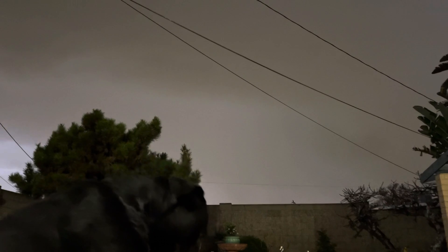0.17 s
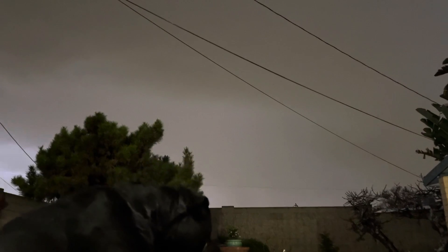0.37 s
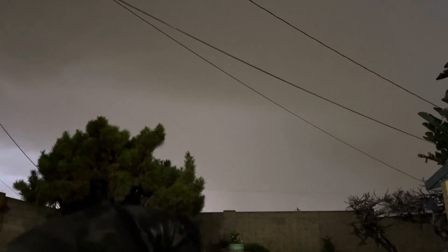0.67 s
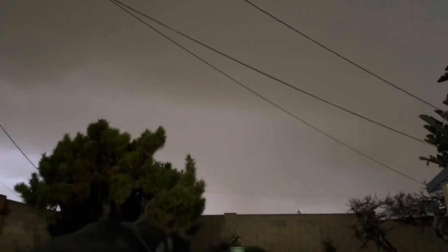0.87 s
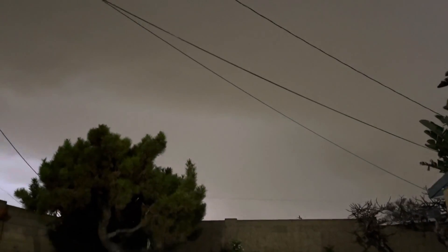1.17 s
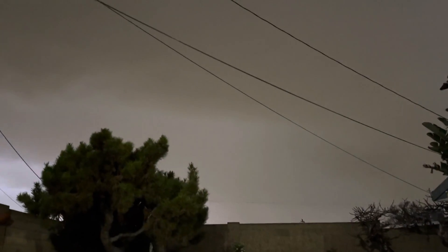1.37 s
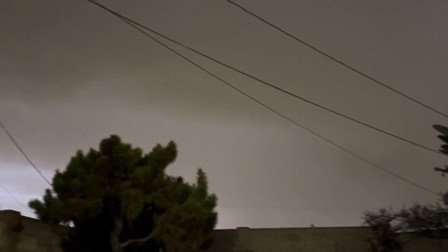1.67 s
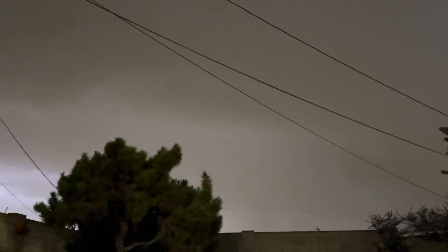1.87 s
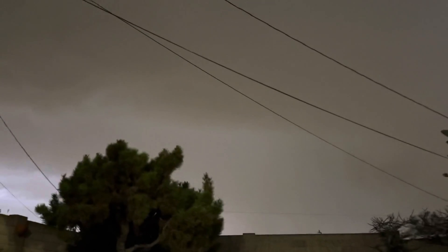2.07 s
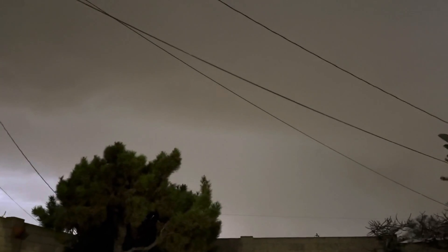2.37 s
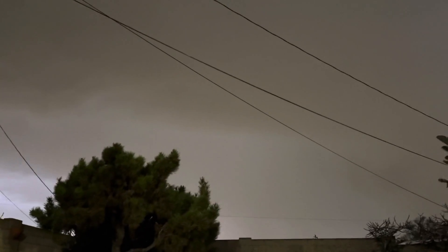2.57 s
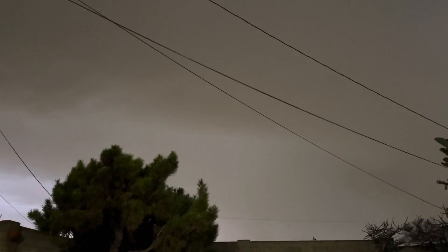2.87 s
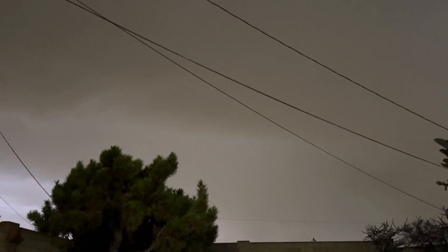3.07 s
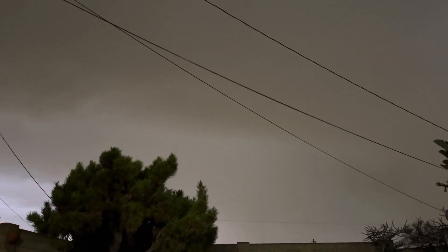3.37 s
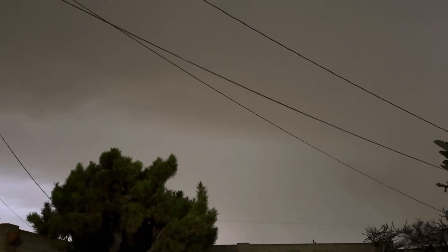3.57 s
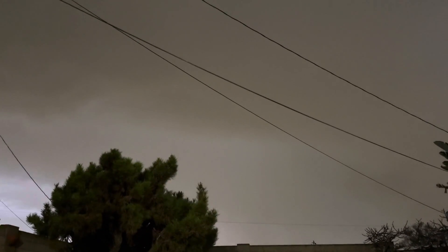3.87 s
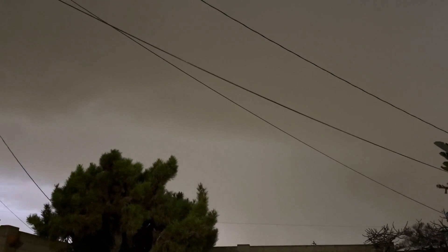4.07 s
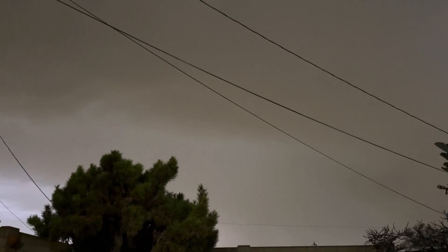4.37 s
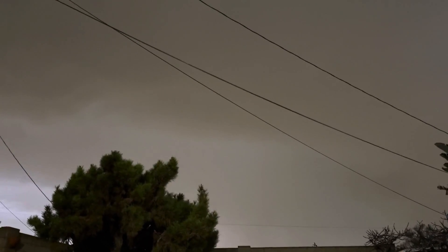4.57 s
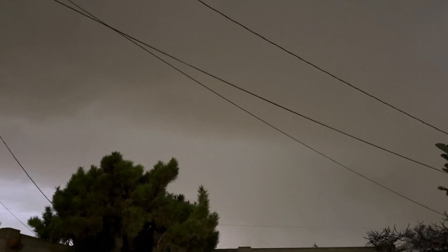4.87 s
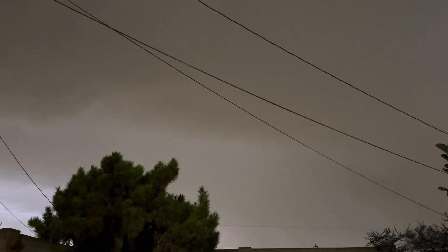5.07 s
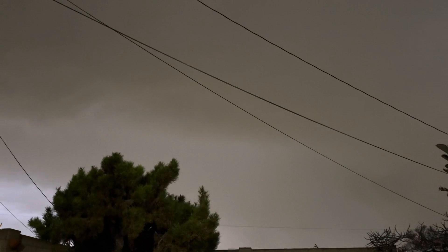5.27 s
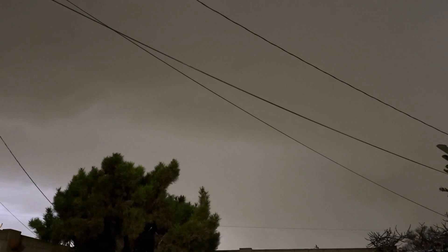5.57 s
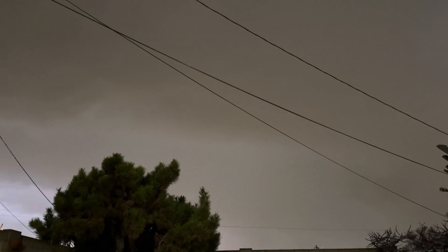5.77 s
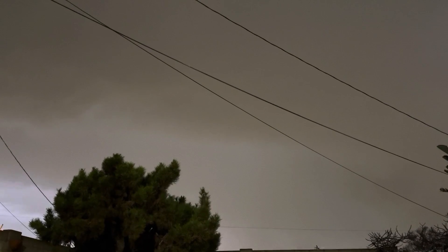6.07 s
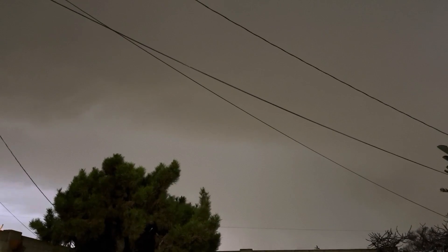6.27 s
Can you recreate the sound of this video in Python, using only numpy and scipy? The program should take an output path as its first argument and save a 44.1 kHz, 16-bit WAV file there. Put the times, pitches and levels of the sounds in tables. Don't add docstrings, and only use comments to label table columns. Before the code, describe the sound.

Long low thunder booms and grumbles over a quiet yard, with close fur rustles, tiny clicks and two light claw taps.

```python
import sys
import numpy as np
from scipy import signal
from scipy.fft import rfft, irfft, next_fast_len
from scipy.io import wavfile
from scipy.ndimage import uniform_filter1d

SR = 44100
rng = np.random.default_rng(int(sys.argv[2]) if len(sys.argv) > 2 else 0)


def magnitude_from_level(level_db):
    exponent = np.asarray(level_db, float) / 20
    return 10 ** exponent


def unload_audio(sound):
    columns = np.transpose(np.atleast_2d(sound))
    steps = np.round(np.clip(columns, -1, 1) * 32767)
    wavfile.write(sys.argv[1], SR, steps.astype(np.int16))


N = 282681
M = next_fast_len(N + SR // 2)
HZ = np.arange(M // 2 + 1) * SR / M


def evened(x):
    return x / np.sqrt(np.mean(x ** 2) + 1e-20)


def read(points, hz):
    f, value = np.transpose(points)
    return np.interp(np.log(hz + 1), np.log(f + 1), value)


def curve(rows, column):
    rows = np.array(rows)
    return np.interp(np.arange(N) / SR, rows[:, 0], rows[:, column])


def above(hz, edge_hz, order):
    return 1 - 1 / (1 + (hz / edge_hz) ** order)


def clicks(per_s, spread_db):
    hit, sign, size = rng.random(N), rng.standard_normal(N), rng.exponential(1, N)
    return (hit < per_s / SR) * sign * magnitude_from_level(spread_db * np.minimum(size, 4))


# f/Hz, left over right level/dB
PORT_LEAN = [(30, 3), (90, 2), (180, 1.0), (350, 0), (700, 0), (1400, 0), (4400, -1.5), (6800, -0.5)]


def ports(direct, scattered, same, lead, hz):
    same = np.clip(same, 0, 1)
    right = same * direct + np.sqrt(1 - same ** 2) * scattered
    right = right * np.exp(-1j * lead)
    lean = magnitude_from_level(read(PORT_LEAN, hz) / 2)
    return irfft(np.array([direct * lean, right / lean]), M)[:, :N]


def buzz(thunder, level_db=-69, hz=12000, width_hz=260):
    band = np.exp(-((HZ - hz) / width_hz) ** 2)
    fizz = irfft(rfft(rng.standard_normal(N), M) * band, M)[:N]
    bass_power = uniform_filter1d(thunder.mean(0) ** 2, 1500)
    return magnitude_from_level(level_db) * evened(fizz) * np.sqrt(abs(bass_power))


# f/Hz, level/dB
FUR_COLOUR = [(400, -31.5), (750, -6), (1900, 2), (3000, -3), (4500, -1.5), (5800, 1), (7500, 2),
              (10500, -4.5), (12300, -3), (13200, -5.5), (16000, -5.5)]
# f/Hz, left-right likeness [0-1]
NEAR_LIKENESS = [(2000, 0.28), (4000, 0.19), (5500, 0.25), (7000, 0.91), (16000, 1)]
# f/Hz, lead [radians]
LEFT_LEAD = [(2000, 0), (4200, .2), (7000, 2.85), (9000, 3.45), (10400, 5.8), (12300, 6.75), (13000, 9.05),
             (15200, 9.8), (16000, 11.0)]


def near(bottom, middle, top):
    low, high = above(HZ, 3800, order=10), above(HZ, 7100, order=10)
    spectra = rfft(bottom, M) * (1 - low)
    spectra = spectra + rfft(middle, M) * (low - high) + rfft(top, M) * high
    direct, scattered = spectra * magnitude_from_level(read(FUR_COLOUR, HZ))
    return ports(direct, scattered, read(NEAR_LIKENESS, HZ), read(LEFT_LEAD, HZ), HZ)


def patchy(x, depth_db):
    z = signal.stft(x, nperseg=256, noverlap=192)[2]
    field = rng.standard_normal(z.shape[1:])
    field = uniform_filter1d(field, size=6, axis=0)
    field = evened(uniform_filter1d(field, size=28, axis=1))
    return evened(signal.istft(z * magnitude_from_level(depth_db * field), nperseg=256, noverlap=192)[1][:, :N])


# t/s, length [s], effort level/dB, brightness level/dB
MOVES = [(0.045, .04, -62.5, -1), (0.123, 0.021, -67, -0.5), (0.202, 0.035, -67.5, -2),
         (0.369, 0.034, -61.5, -8.5), (0.611, 0.018, -62, -9.5), (0.696, 0.011, -66.5, 0.5),
         (0.859, 0.14, -65.5, -9), (1.059, .07, -70.5, -4), (1.208, 0.045, -63, -5),
         (1.273, .04, -70.5, -9.5), (1.35, .05, -75.5, 6), (1.476, 0.14, -63, -7.5),
         (1.658, 0.018, -65.5, -10), (1.732, 0.029, -71, -4.5), (1.89, 0.045, -72, -3),
         (1.975, .16, -67.5, -10.5), (2.254, 0.043, -71, -4), (2.4, .03, -68.5, -10),
         (2.799, 0.068, -72.5, -4), (3.036, .04, -76.5, 5.5), (3.295, 0.018, -69, -7.5),
         (4.05, .09, -76.5, -14.5), (4.36, 0.022, -77, -16.5), (4.65, .02, -73.5, -3.5),
         (4.898, 0.086, -73.5, -14), (5.15, 0.036, -73, -13), (5.219, .03, -77.5, 7),
         (5.331, 0.037, -67.5, -9.5), (6.14, 0.09, -72.5, -7.5), (6.28, 0.055, -71, -14.5)]
# t/s, length [s], effort level/dB, brightness level/dB
WEIGHT_SHIFTS = [(2.46, .07, -68.5, -12), (3.41, .03, -79.5, -11.5), (3.59, 0.03, -79, -8.5),
                 (3.75, 0.025, -81.5, -8.5), (3.87, 0.032, -79, -9), (4.572, .045, -73.5, -4),
                 (4.68, 0.034, -70, -8), (5.47, 0.046, -75.5, -12.5), (5.82, 0.038, -77, -13.5),
                 (6.0, 0.043, -76, -12.5)]


def effort():
    rise_db_per_s, sag_db_per_s, fall_db_per_s = 899, 20, 328
    hiss_db, hiss_bright_db, stir_db, settle_db_per_s = -81, -7.5, -3, 0.5
    t = np.arange(N) / SR
    coarse = t[::32]
    stir = 0
    for f in np.geomspace(.7, 14, num=20):
        stir = stir + np.sin(2 * np.pi * (f * coarse + rng.random())) / np.sqrt(f)
    stir = np.interp(t, coarse, evened(stir))
    power = magnitude_from_level(hiss_db - settle_db_per_s * (t - 5) + stir_db * stir) ** 2
    bright = power * hiss_bright_db
    for s, length, db, bright_db in MOVES + WEIGHT_SHIFTS:
        part = slice(max(round((s - .05) * SR), 0), round((s + length + .2) * SR))
        u = t[part] - s
        loss_db = rise_db_per_s * np.maximum(-u, 0) + sag_db_per_s * np.maximum(u, 0)
        loss_db += fall_db_per_s * np.maximum(u - length, 0)
        move = magnitude_from_level(db - loss_db) ** 2
        power[part] += move
        bright[part] += move * bright_db
    return 10 * np.log10(power), bright / power


# f/Hz, level/dB, t60 [s]
TAG_MODES = [(3880, -11, .1), (4320, -11, .07), (4590, -6, .05), (5655, 0, .08), (5750, -3, .07),
             (6030, -6, .05), (6290, -8, .05), (10490, -9, .05), (10880, -8, .05), (11350, -10, .05),
             (11820, -10, .05)]


def tag(chance, t):
    ring = 0
    for (hz, db, t60), (phase, balance) in zip(TAG_MODES, chance):
        decay = magnitude_from_level(db + 5.9 * (balance + 1.0) - 60 * t / t60)
        ring = ring + decay * np.sin(2 * np.pi * (hz * t + phase))
    return ring


# t/s, level/dB
TAG_SWING = [
    (0, 0),
    (1.8, 0),
    (2.5, -4),
    (3.0, -25),
    (6.41, -25),
]


def scuffs(level_db=10.5, bottom_db=4.0, top_db=-1.5, jingle_db=-4, shake=1.0):
    thinning = 0.62
    grit = patchy(np.array([clicks(6000, spread_db=-3.5) for _ in range(2)]), depth_db=2.5)
    effort_db, bright_db = effort()
    ring = tag(rng.random((len(TAG_MODES), 2)), np.arange(SR // 8) / SR)
    shakes = signal.oaconvolve(clicks(250, spread_db=3.5), ring)
    shake_db = curve(TAG_SWING, 1) + jingle_db + shake * (effort_db + 56.0)
    grit = grit + evened(shakes[:N]) * magnitude_from_level(shake_db)
    grit *= magnitude_from_level(effort_db + level_db)
    bottom = grit * magnitude_from_level(bottom_db - thinning * (effort_db + 73.5))
    return near(bottom, grit, grit * magnitude_from_level(bright_db + top_db))


# t/s, peak level/dB, brightness of the top level/dB, tag ring level/dB
CONTACTS = [(0.0425, -54, -9.5, -26.5), (0.0533, -41.5, -13, -24.5), (0.1241, -44, -11, -11),
            (0.197, -47, -15.5, -19), (0.3787, -33.5, -20.5, -27), (0.598, -45.5, -10, -16),
            (0.6245, -45.5, -3, -25), (0.637, -32, -11.5, -15.5), (0.704, -40.5, -8.5, -25.5),
            (0.8973, -42.5, -19, -18), (0.9427, -52, -16, -8), (0.9844, -49, -26.5, -13),
            (1.1061, -55.5, -12, -14), (1.2141, -48, -7, -25), (1.495, -51, -19.5, -26),
            (1.5797, -47, -21.5, -11.5), (1.6762, -40, -11, -13), (1.919, -52, -9, -25),
            (1.9806, -43.5, -30, -22.5), (2.1201, -51, -26.5, -23), (2.25, -43, -21, -12),
            (2.4064, -52, -14.5, -11), (2.7257, -58.5, -19, -19.5), (2.8177, -49.5, -8.5, 2),
            (3.2957, -42, -37, -20), (3.4096, -62, -22.5, -18), (4.57, -42, -32.5, -22),
            (4.649, -49.5, -7, -23), (5.0918, -61, -19, -16.5), (6.4075, -53, -7.5, -30)]


def ticks(level_db=-5.5, bottom_db=3, top_db=13, tail_db=-17, tail_s=0.094, ring_db=-3):
    thinning, dull_weight = 0.36, .4
    t = np.arange(SR // 8) / SR
    parts = np.zeros((3, 2, N + SR))
    quick = magnitude_from_level(-np.array([0, 0, 700.])[:, None, None] * t) + .03
    touches = [(s, db + 4, bright_db - 4.5, -23.5) for s, _, db, bright_db in MOVES]
    for s, db, bright_db, tag_db in CONTACTS + touches:
        weight_db = -thinning * (db + 70.5) - dull_weight * (bright_db + 19)
        spray, chance = rng.standard_normal((2, len(t))), rng.random((len(TAG_MODES), 2))
        spray[:, 0] = 6.5
        crack = spray * (magnitude_from_level(-60 * t / 0.025) + magnitude_from_level(tail_db - 60 * t / tail_s))
        swing_db = np.interp(s, *np.transpose(TAG_SWING)[:2])
        ring = magnitude_from_level(tag_db + ring_db + swing_db) * tag(chance, t)
        gains = magnitude_from_level(db + level_db + np.array([weight_db + bottom_db, 0, bright_db + top_db]))
        tick = gains[:, None, None] * crack * quick + gains[1] * ring
        parts[..., round((s + .001) * SR):][..., :len(t)] += tick
    return near(*parts[..., :N])


# t/s, snap level/dB, low body level/dB and upper body level/dB over the snap
CLAW_KNOCKS = [
    (3.2972, -47.5, -19, 0),
    (4.5685, -45.5, 19, 3.5),
]
# f/Hz, level/dB, t60 [s]
STEP_MODES = [(3830, 1.5, 0.013), (4980, 2, 0.0077), (4550, -11.5, .07)]


def knocks(body_hz=820, body_t60=0.045, upper_hz=2000, upper_t60=.015):
    t, out = np.arange(SR // 10) / SR, np.zeros(N + SR)
    onset = 1 - np.exp(-t / 0.00074)
    for s, db, body_db, upper_db in CLAW_KNOCKS:
        body = [(body_hz, body_db, body_t60), (upper_hz, upper_db, upper_t60)]
        for hz, mode_db, t60 in STEP_MODES + body:
            mode = magnitude_from_level(db + mode_db - 60 * t / t60) * np.sin(2 * np.pi * hz * t)
            out[round(s * SR):][:len(t)] += mode * onset
    return out[:N]


def echoes(t60):
    t = np.arange(SR // 3) / SR
    smear = rfft(rng.standard_normal(len(t)) * magnitude_from_level(-60 * t / t60), M)
    return smear / abs(smear)


def dip_around(strong, depth=90):
    power = uniform_filter1d(uniform_filter1d(strong.mean(0) ** 2, size=900), size=500)
    return 1 / np.sqrt(1 + abs(depth) * abs(power))


# t/s, level/dB, nearness of the channel level/dB
FAR_ROLL = [(0.0, -40, 15.5), (.3, -37, 12.5), (0.58, -26, 0.5), (1.17, -26, 3.5), (1.5, -29.5, 3.5),
            (1.75, -35.5, 8), (2.33, -27, 2.5), (2.91, -28.5, 1.5), (3.2, -27, -3), (3.5, -23.5, -4.5),
            (3.8, -28, -3), (4.08, -21.5, -10), (4.4, -23.5, -9), (4.66, -28, -4), (5.24, -29, -1),
            (5.55, -23.5, -7.5), (5.83, -27.5, -7), (6.41, -33, -4)]
# t/s, rise [s], peak level/dB, favoured crowd [0 long - 3 shortest]
CHANNEL_BENDS = [(-0.08, .08, -28.5, 0.3), (0.129, .095, -27, 0.41), (.5, 0.021, -30, 2.5),
                 (.58, 0.042, -24.5, 2.05), (.7, 0.077, -20.5, 2), (.85, 0.019, -16.5, .5),
                 (1.03, .05, -25, 0), (1.31, 0.075, -21, 3.5), (1.361, 0.055, -22.5, 1),
                 (1.64, 0.038, -29.5, 1.4), (1.939, 0.028, -24, 1), (2.03, 0.048, -23.5, -0.5),
                 (2.17, .05, -21, 1.25), (2.31, 0.075, -24.5, 1.9), (2.59, .03, -20, 0),
                 (2.619, .11, -22, 2), (2.671, 0.093, -22, -0.1), (3.35, .086, -21.5, 1),
                 (3.61, 0.1, -21, 7), (3.83, 0.067, -19, 0.34), (4.191, 0.065, -25.5, 1.5),
                 (4.71, 0.059, -14.5, 0), (4.8, 0.15, -20, 1.2), (4.99, .048, -19.5, 0),
                 (5.23, 0.075, -15.5, 0.75), (5.349, 0.065, -19, 1.35), (5.61, 0.026, -22, 1),
                 (5.9, .08, -23, 1.5), (6.01, 0.14, -26.5, 1.34), (6.28, .11, -25.5, 1.5)]
CROWD_LEVEL = [1, -1.17, -5, -14.5]
DISTANCE_SHARE = [0.02, .37, .61, .95]


def arrivals_db(crowd):
    favour_db, sharpness = 5, 1.17
    t = np.arange(N) / SR
    near_db = DISTANCE_SHARE[crowd] * curve(FAR_ROLL, 2)
    power = magnitude_from_level(curve(FAR_ROLL, 1)) ** 2
    for s, rise_s, db, favoured in CHANNEL_BENDS:
        u = np.maximum(t - s, 0)[::32] / rise_s
        swell = (u * np.exp(1 - u)) ** sharpness
        peak = magnitude_from_level(db - favour_db * (crowd - favoured) ** 2)
        power += np.interp(t, t[::32], (swell * peak) ** 2)
    return 10 * np.log10(power) + near_db + CROWD_LEVEL[crowd]


CROWD_EDGES = [115, 260, 600]
CROWD_RATES = [400, 800, 2000, 12000]
# f/Hz, level/dB per Hz
AIR_COLOUR = [(12, -47.5), (20, -21), (71, -1), (96, 0), (130, -7), (177, -3), (266, -14), (361, -13.5),
              (480, -23.5), (542, -20), (920, -22.5), (1020, -27.5), (1250, -32), (1380, -40.5),
              (2600, -70), (3380, -94.5), (5720, -120)]
# f/Hz, left-right likeness [0-1]
THUNDER_LIKENESS = [(30, 1), (90, 0.98), (180, 0.93), (350, 0.69), (700, 0.14), (1400, 0.96), (2600, .3)]


def roll(thinning, spread_db=2.0, steady=0.94, steady_s=0.076):
    passed = [above(HZ, f, order=8) for f in CROWD_EDGES]
    cuts = [np.ones(len(HZ))] + passed + [np.zeros(len(HZ))]
    lead = np.minimum((HZ / 850) ** 2, 1.4)
    smear, out = echoes(t60=.06), np.zeros((2, N))
    size = round(steady_s * SR)
    for k, per_s in enumerate(CROWD_RATES):
        band = np.sqrt(np.maximum(cuts[k] - cuts[k + 1], 0))
        colour = magnitude_from_level(read(AIR_COLOUR, HZ)) * band * smear
        direct, scattered = (rfft(clicks(per_s, spread_db), M) * colour for _ in range(2))
        crowd = ports(direct, scattered, read(THUNDER_LIKENESS, HZ), lead, HZ)
        crowd /= np.std(crowd.mean(0))
        power = uniform_filter1d(uniform_filter1d(crowd.mean(0) ** 2, size), size)
        crowd = crowd / (abs(power) + 0.055) ** (steady / 2)
        out += crowd * magnitude_from_level(arrivals_db(k)) * (thinning if k < 2 else 1)
    return out


# t/s, peak level/dB, swing f/Hz
STRONG_SHOCKS = [(0.526, -7, 177.3), (0.62, -4.5, 192.5), (0.714, -8, 188.8), (0.772, -1.5, 92.3),
                 (0.859, -2, 87.4), (1.075, -4, 158.6), (1.381, -15, 188), (1.666, -15, 128.5),
                 (1.859, -14, 101), (2.237, -5, 90.4), (2.344, -3.5, 191), (2.621, -6, 82),
                 (2.716, -5, 169), (2.759, -6, 71.4), (3.393, -11, 89), (3.456, -6.5, 85.2),
                 (3.544, -15, 74.5), (3.668, -5.5, 95.2), (3.848, -16, 66.1), (4.231, -4.5, 98),
                 (4.318, -13, 97), (4.505, -21.5, 87.7), (4.763, -4.5, 105.5), (4.724, -5, 65),
                 (4.789, -2.5, 146.4), (5.291, -6.5, 174.6), (5.34, -7.5, 110.8), (5.389, -0.5, 75.4),
                 (5.501, -19, 70.6), (5.666, -14, 79.4)]


def booms(level_db=-6, glide=.2, swings=2.1):
    out = np.zeros(N + SR)
    for s, db, hz in STRONG_SHOCKS:
        u = np.arange(round(8 * SR / hz)) * hz / SR
        wave = np.sin(2 * np.pi * (u + glide * (1 - np.exp(-u / .6))))
        wave = wave * u * np.exp(1 - u / swings * 2) * (1 - u / u[-1])
        out[round(s * SR):][:len(u)] += magnitude_from_level(db + level_db) * wave / abs(wave).max()
    return out[:N] * magnitude_from_level(read(PORT_LEAN, 100) / 2 * np.array([[1], [-1]]))


def scene():
    strong = booms()
    thunder = roll(dip_around(strong)) + strong
    return thunder + scuffs() + ticks() + knocks() + buzz(thunder)


def top_cut(x):
    return signal.sosfilt(signal.butter(12, 15890, fs=SR, output="sos"), x)


def record(dry):
    heard = signal.sosfilt(signal.butter(2, 43, "high", fs=SR, output="sos"), dry)
    ceiling = .8
    return top_cut(ceiling * np.tanh(heard / ceiling))


dry = scene()
out = record(dry)
unload_audio(out)
```